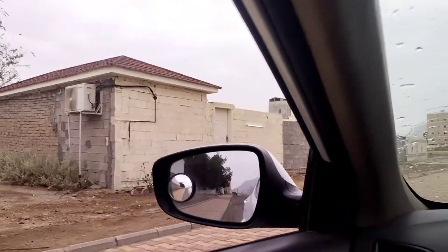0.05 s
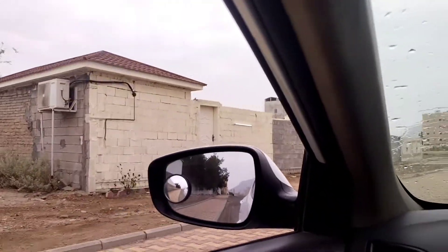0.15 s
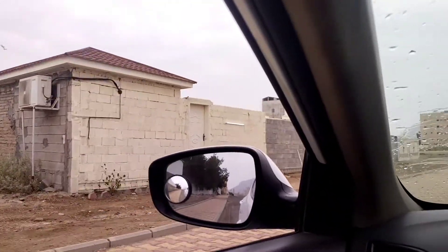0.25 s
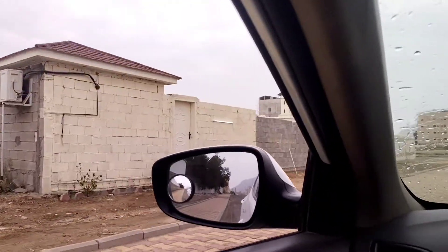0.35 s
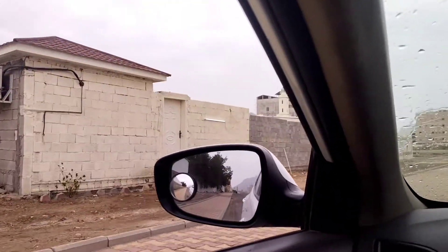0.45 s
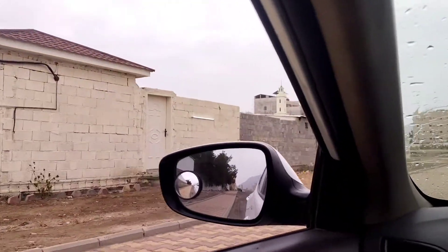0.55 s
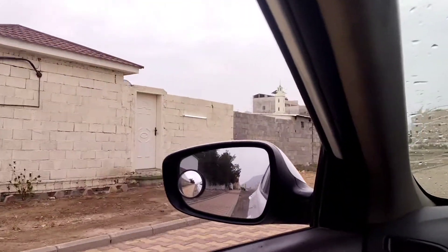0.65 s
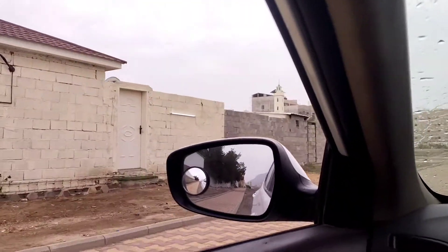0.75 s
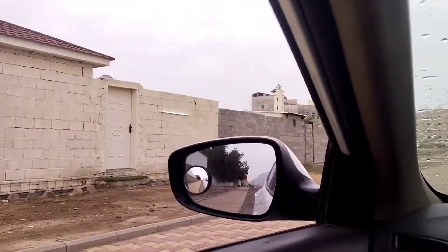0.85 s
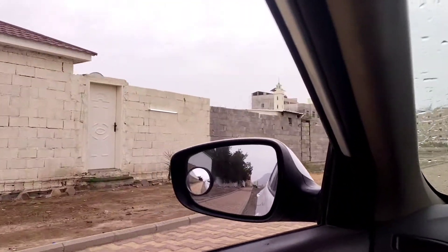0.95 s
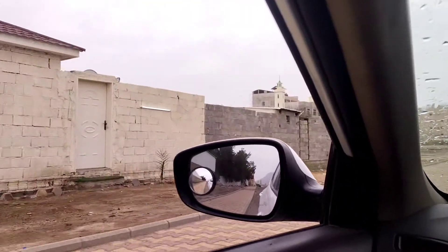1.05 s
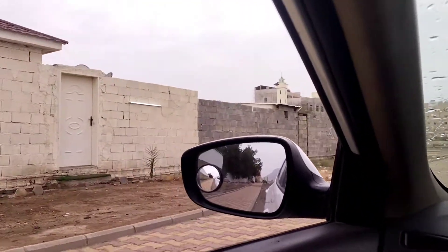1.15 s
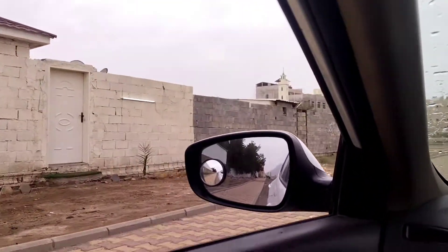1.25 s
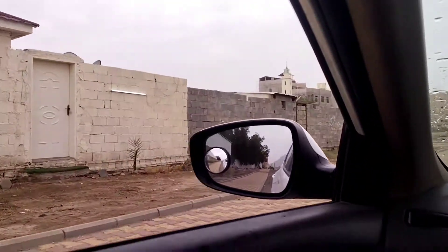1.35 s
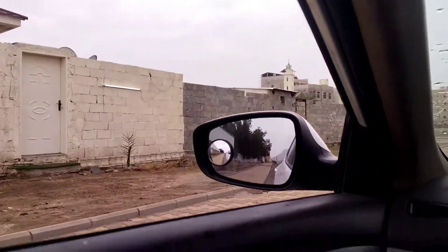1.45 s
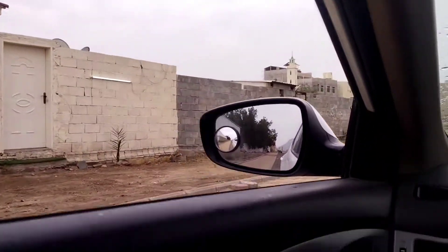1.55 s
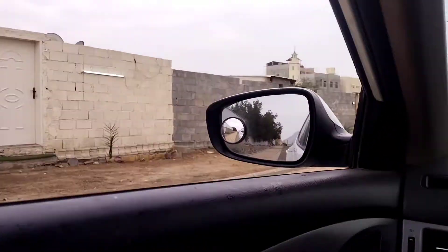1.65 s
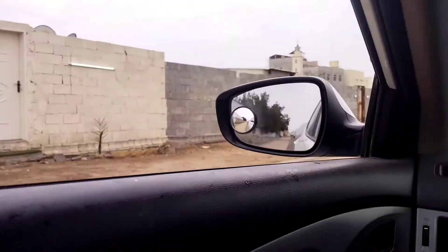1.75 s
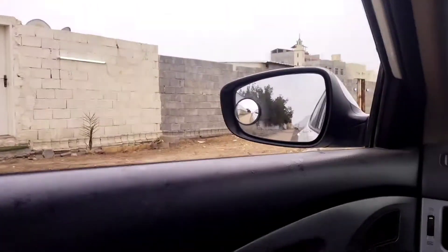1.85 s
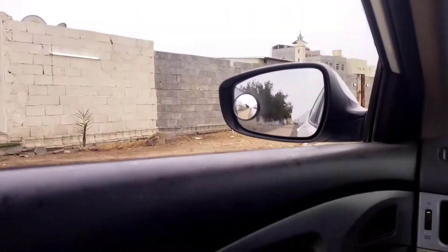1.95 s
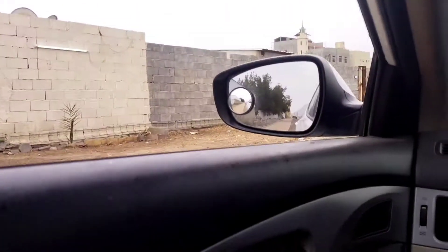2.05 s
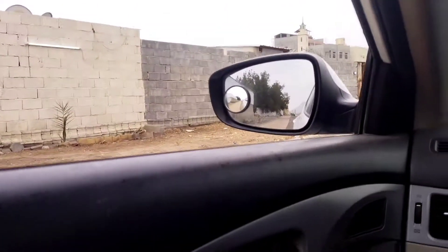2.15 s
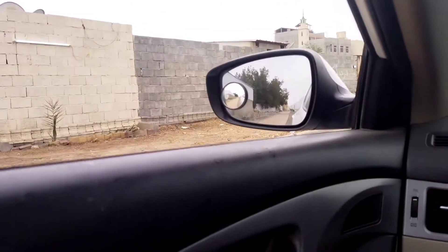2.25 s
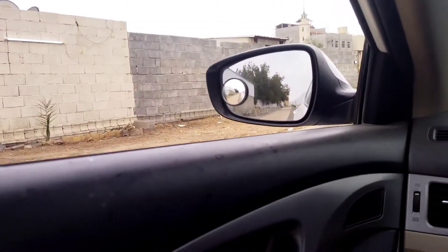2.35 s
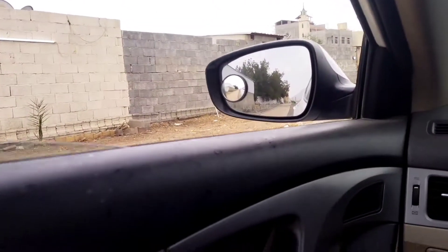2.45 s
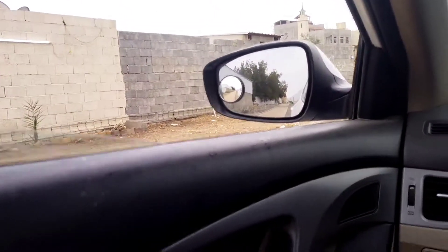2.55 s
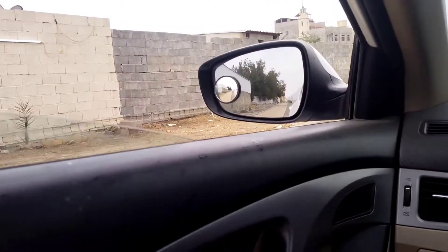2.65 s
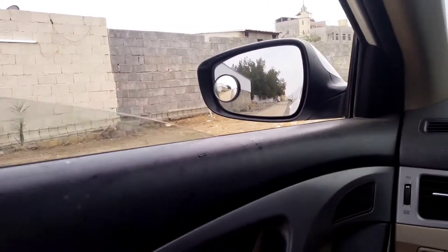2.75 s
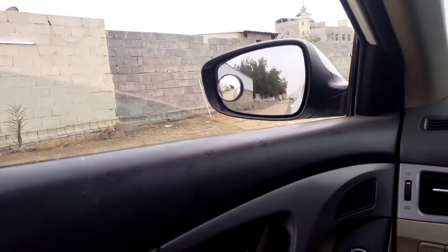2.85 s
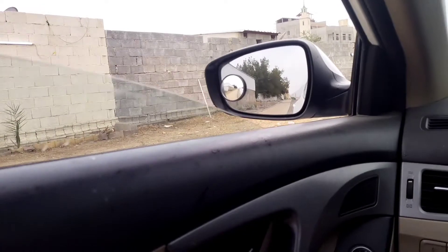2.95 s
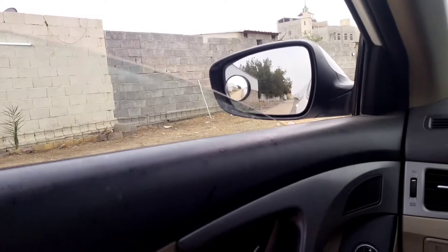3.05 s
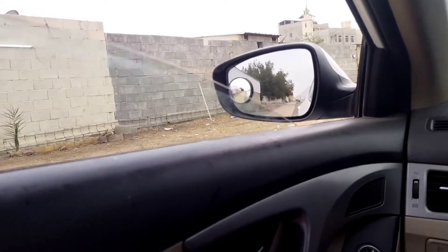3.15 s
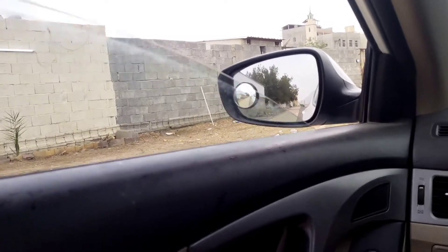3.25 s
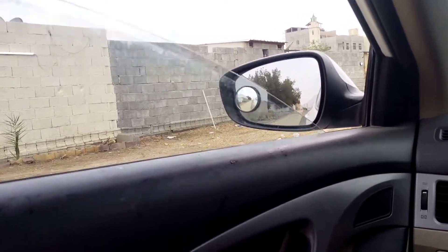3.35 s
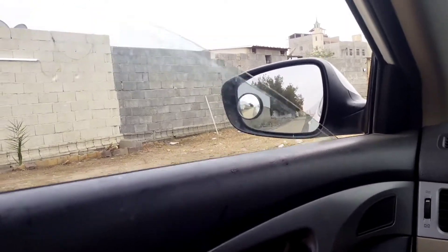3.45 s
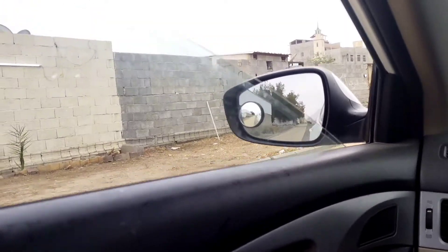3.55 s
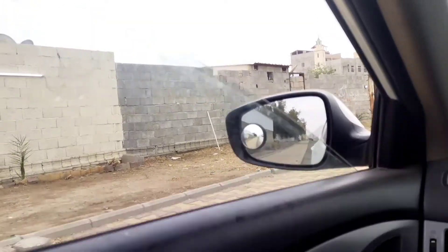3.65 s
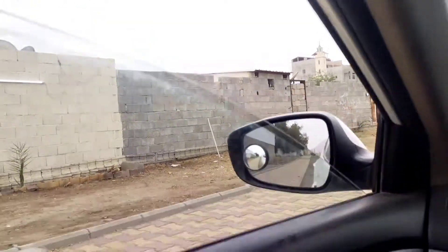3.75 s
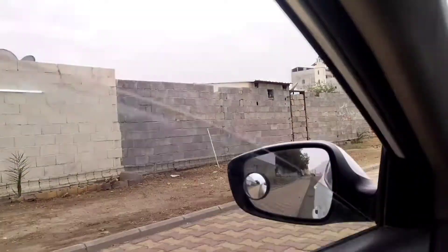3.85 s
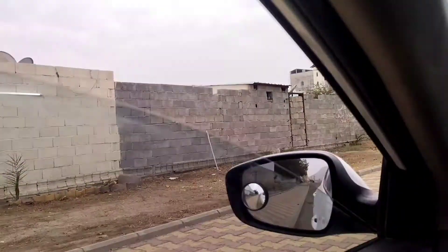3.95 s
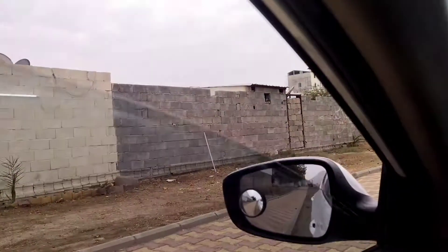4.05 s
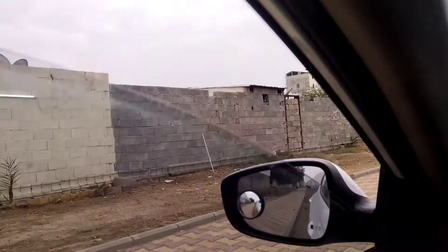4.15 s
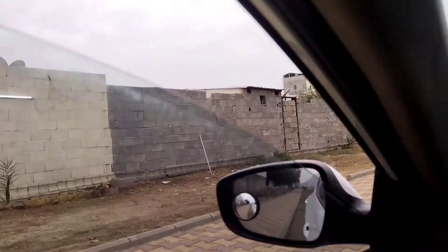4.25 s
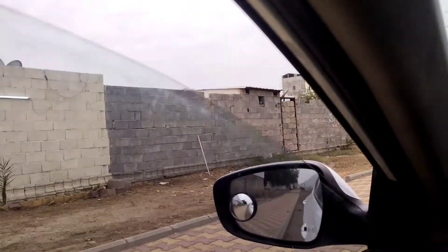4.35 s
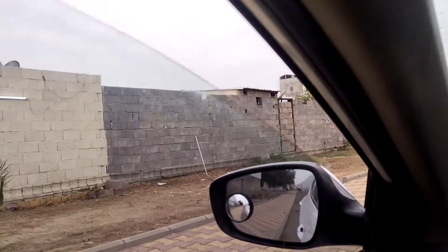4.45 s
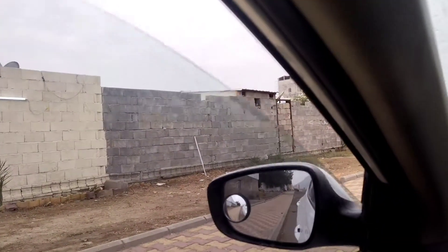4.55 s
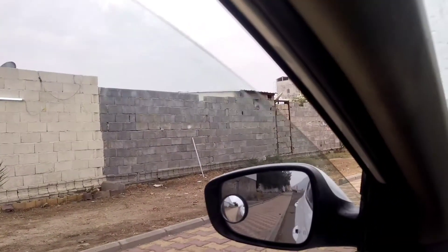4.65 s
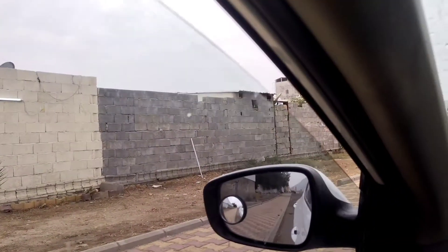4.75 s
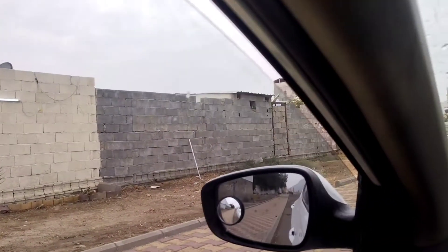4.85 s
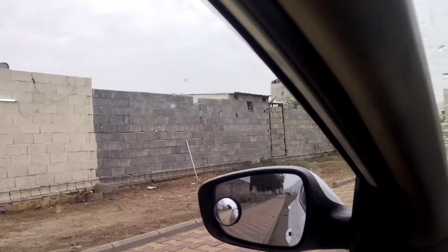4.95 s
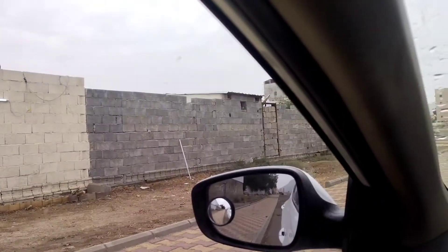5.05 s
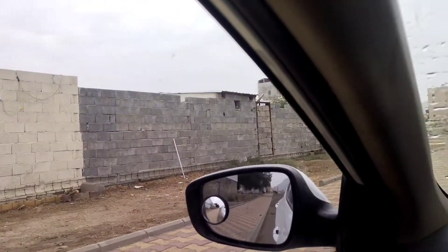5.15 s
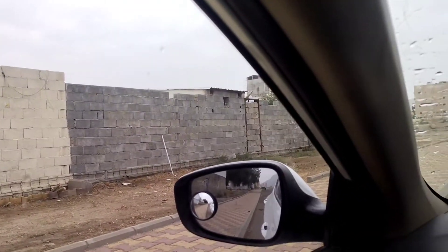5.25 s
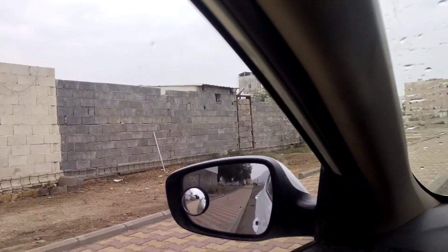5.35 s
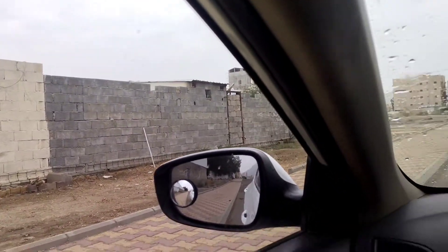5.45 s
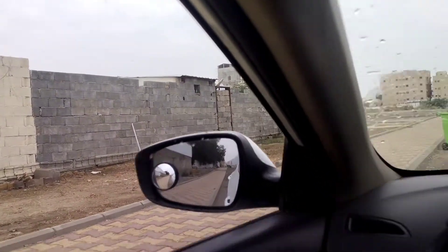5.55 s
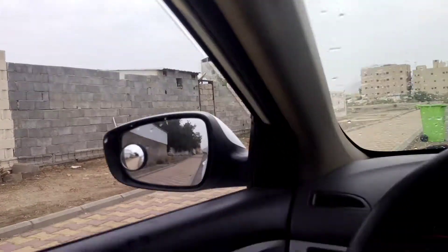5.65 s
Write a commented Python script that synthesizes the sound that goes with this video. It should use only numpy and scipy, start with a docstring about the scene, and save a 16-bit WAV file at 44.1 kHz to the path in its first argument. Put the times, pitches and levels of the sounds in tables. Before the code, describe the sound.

A car window motor whines and sags over low road rumble, glass hissing along its seals, then knocks shut before more clicks and a brief restart.

```python
"""From the seat beside an open window in a slowly rolling car: road rumble, engine hum and air, all noise and sines.
Blows ring the door's modes, a sleeve rubs and trim clicks; a switch snaps and an electric motor whines, sagging.
Gear noise rings its housing and the glass hisses along its seals, rasps into the top one and knocks into its frame.
The outside air drops away; the switch clicks again, the gear knocks and a rising whine tugs the pane from its seal."""
import sys
import numpy as np
from scipy import signal
from scipy.fft import rfft, irfft
from scipy.io import wavfile
from scipy.ndimage import uniform_filter1d

SR = 44100
rng = np.random.default_rng(int(sys.argv[2]) if len(sys.argv) > 2 else 0)


def store_pcm(level_fs):
    """Save levels as 16-bit WAV."""
    pcm = np.round(np.clip(level_fs, -1, 1) * 32767).astype(np.int16)
    wavfile.write(sys.argv[1], SR, np.atleast_2d(pcm).T)


N = 250750
TIME = np.arange(N) / SR
START_S, SHUT_S = 2.28, 5.135  # the motor is switched on, and the glass meets the frame
SPIN_UP_RISE_S = 0.018  # how quickly the whine comes in


def amp(db):
    """Decibels to gain."""
    return 10 ** (np.asarray(db) / 20)


def evened(x):
    """Scales to an rms of one."""
    return x / np.sqrt(np.mean(x ** 2) + 1e-20)


def read(points, hz):
    """Reads a table of values against frequency on a log-frequency axis."""
    f, value = np.transpose(points)
    return np.interp(np.log(hz + 1), np.log(f + 1), value)


def spectrum(points):
    """The dB spectrum drawn by a table of (Hz, dB) points."""
    return lambda hz: read(points, hz)


def resonances(modes):
    """The dB spectrum of a set of (Hz, width Hz, dB) resonances, their powers added."""
    def level_db(hz):
        power = sum(amp(db) ** 2 / (1 + ((hz - c) / w) ** 2) ** 2 for c, w, db in modes)
        return 10 * np.log10(power)
    return level_db


def curves(rows):
    """Each column of a time table, at every sample."""
    s, *columns = np.transpose(rows)
    return [np.interp(TIME, s, c) for c in columns]


def add(mix, s, sound):
    """Lays a sound into the mix at time s."""
    part = mix[:, max(round(s * SR), 0):][:, :sound.shape[-1]]
    part += sound[..., :part.shape[1]]


def panned(db):
    """Left and right gains for a level difference."""
    return amp(np.array([[db], [-db]]) / 2)


def swell(s, half):
    """A smooth rise and fall round time s."""
    fall = np.exp(-1.88 * abs(TIME - s) / half)
    return 2 * fall / (1 + fall ** 2)


def step(s, rise):
    """A smooth step from zero to one round time s."""
    return .5 + .5 * np.tanh((TIME - s) / rise)


def wander(rate_hz):
    """Slow chance of rms one, up to about the given rate."""
    coarse = TIME[::25]
    hz = np.fft.rfftfreq(len(coarse), coarse[1])
    drift = irfft(rfft(rng.standard_normal(len(coarse))) / (1 + (hz / rate_hz) ** 4), len(coarse))
    return np.interp(TIME, coarse, evened(drift))


def noise(colour, patchy_db=0, lean=1, size=N, comb_db=2.2):
    """Coloured noise with drifting patches at two microphone ports; the treble reaches the left one later."""
    # how alike the two ports hear a band: hz, likeness (0 to 1)
    port_likeness = [(60, 0.96), (200, 0.96), (400, 0.57), (700, 0.49), (1400, 0.095), (3000, 0.083),
                     (7000, 0.057), (15000, 0.081)]
    # left against right over the spectrum: hz, balance_db
    port_balance = [(60, 2), (200, -0.5), (700, -1), (1300, -0.5), (2400, 6), (4400, 6), (8000, 4),
                    (15000, -3.5)]
    port_lag_s = .0005
    hz = np.fft.rfftfreq(2048, 1 / SR)
    a, b, c, d, patches, ripple = rng.standard_normal((6, size // 512 + 5, len(hz)))
    patches = evened(uniform_filter1d(uniform_filter1d(patches, size=8, axis=0), size=16, axis=1))
    # reflections from glass and trim, as a slowly shifting chance ripple that is full above 1200 Hz
    ripple = evened(uniform_filter1d(uniform_filter1d(ripple, size=45, axis=0), size=6, axis=1))
    ripple_db = comb_db * np.minimum(hz / 1200, 1) * ripple
    same = np.clip(read(port_likeness, hz), -1, 1)
    left, own = a + 1j * b, c + 1j * d
    lead = np.exp(2j * np.pi * hz * port_lag_s * (hz > 1000))
    z = np.array([left, same * lead * left + np.sqrt(1 - same ** 2) * own])
    side_db = lean * read(port_balance, hz) / 2
    sides_db = np.array([side_db, -side_db])[:, None]
    z *= amp(colour(hz) + patchy_db * patches + ripple_db + sides_db)
    x = signal.istft(z.swapaxes(1, 2), nperseg=2048, noverlap=1536)[1][:, :size]
    return x / np.std(x.mean(0))


def cabin():
    """Road rumble and tyre hiss as coloured noise, engine as multiples of its firing rate; shutting dulls the air."""
    # road noise in the cabin, easing as the car rolls on: start_s, level_db
    road_level = [(0, -37), (.5, -44), (1.15, -44.5), (1.45, -47.5), (2.2, -47.5), (2.8, -52.5),
                  (4.2, -55.5), (5.69, -49)]
    # its spectrum: hz, relative level_db
    road_colour = [(20, -9), (45, -5), (70, -16), (95, 9.5), (125, 5), (190, 1.5), (260, -12.5), (400, -16),
                   (550, -22), (900, -35.5), (1100, -24.5), (1400, -36), (1800, -35.5), (2900, -37.5),
                   (5000, -48.5), (15000, -55)]
    # tyre hiss and outside air through the opening: start_s, level_db
    air_level = [(0, -71), (.58, -61.5), (.95, -62.5), (1.5, -60.5), (1.95, -61), (2.15, -55.5),
                 (2.55, -60.5), (3.75, -58), (4.15, -63.5), (4.8, -61.5), (5.1, -62.5)]
    # its spectrum: hz, relative level_db
    air_colour = [(300, 2), (750, 9), (930, 2), (1100, 1), (1350, 4), (1540, -1), (1780, 4.5), (2250, -4),
                  (2650, 0.5), (2950, -2.5), (3350, 1), (3900, -3.5), (5000, -4.5), (6300, -5),
                  (8000, -6.5), (11000, -15), (15000, -22)]
    # engine: start_s, firing_hz, level_db
    engine = [(0, 31.01, -54), (2.9, 32.49, -53.5), (3.75, 34.38, -42.5), (4.4, 34.66, -46.5),
              (5.69, 34.25, -38.5)]
    # engine orders: multiple of the firing rate, relative level_db
    orders = [(2, -26.5), (3, -13), (4, -8), (5, -6.5), (8, -13), (9, -10), (10, -12), (12, -16.5)]
    gust_db, gust_hz = 1.16, 27  # the outside air flutters
    sealed_db, sealing_s = -23, 0.061  # the shut window takes this much off it, within this time

    road = amp(curves(road_level)[0]) * noise(spectrum(road_colour), patchy_db=1.7)
    sealing = np.clip((TIME - SHUT_S) / sealing_s, 0, 1)
    air_db = curves(air_level)[0] + gust_db * wander(gust_hz) + sealed_db * sealing
    air = amp(air_db + .7 * wander(120)) * noise(spectrum(air_colour), patchy_db=2.1, comb_db=3)
    firing_hz, hum_db = curves(engine)
    turns = np.cumsum(firing_hz * (1 + 0.0025 * wander(2.13))) / SR
    hum = np.zeros(N)
    for k, db in orders:
        hum += amp(db + 2.5 * wander(5.7)) * np.sin(2 * np.pi * (k * turns + rng.random()))
    return road + air + amp(hum_db) * hum


def blows(count=3, detune=0.032, attack_s=0.0036, thud_db=-14, thud_t60=.11):
    """Each push rings the door's modes near its centre over a dull trim thud, then rebounds after ever shorter waits."""
    # blows on the door, from road bumps, gear, glass and hand:
    # start_s, ring peak level_db, push centre_hz, narrowness, each rebound against the last (dB)
    pushes = [(0.037, -23, 132, 4, -8), (0.246, -34.5, 126, 6.8, -27), (0.71, -48.5, 290, 1.8, 1.5),
              (1.04, -40, 274, 2.4, -4.5), (2.017, -29, 730, 1.75, -8.5), (2.179, -42, 766, 7.6, -15),
              (2.285, -29.5, 457, 1.1, -7), (2.308, -28, 500, 1.7, -11), (2.316, -31, 228, 1.9, -23),
              (2.324, -32.5, 790, 7.7, -9.5), (2.346, -28, 198, 1.8, -20), (2.36, -35, 170, 1, -15),
              (2.371, -34, 180, 1.1, -7), (3.922, -26.5, 171, 2.3, -1), (4.073, -29, 267, 1.6, -26),
              (5.022, -27.5, 138.4, 2.6, -9), (5.084, -30.5, 116, 2.47, -25), (5.131, -18, 112, 1.66, -9.5),
              (5.135, -26.5, 566, 4.2, -20), (5.162, -25, 139, 1.2, -24), (5.184, -21, 122, 2.2, -8),
              (5.467, -30.5, 402, 0.73, -15), (5.506, -27.5, 290, 1.3, -11), (5.552, -20, 750, 0.7, -29),
              (5.555, -22, 305, 2.7, -26), (5.587, -26.5, 280, 0.75, -12)]
    # door modes: hz, level_db, t60_s
    door_modes = [(92.3, -1.5, 0.12), (120.2, 1, 0.14), (167.2, 2.5, 0.15), (205, 11, 0.039),
                  (275, 5.5, 0.16), (337.8, 1, 0.16), (438, 7.5, 0.069), (569, 7.5, 0.036), (726, -2, 0.1),
                  (805, -7.5, 0.13), (990, 9.5, 0.013), (1198, 13, 0.025), (1340, -9, 0.017)]
    rebound_s, rebound_shrink = .032, .76  # first wait; each later wait is this share of the last

    out, t = np.zeros((2, N)), TIME[:SR // 4]
    hz, mode_db, t60 = np.transpose(door_modes)[:, :, None]
    sign = (-1) ** np.arange(len(door_modes))[:, None]  # neighbouring modes swing in opposite senses
    decays = sign * amp(mode_db - 60 * t / t60)
    bins = np.fft.rfftfreq(len(t), 1 / SR) + 1
    attack = 1 - np.exp(-t / attack_s)
    for s, db, centre_hz, narrow, rebound_db in pushes:
        push = lambda f: 1 / (1 + (narrow * np.log(f / centre_hz)) ** 2) ** 2
        struck_hz = hz * (1 + detune * rng.standard_normal(hz.shape))  # each blow rings a little differently
        ring = (decays * push(hz) * np.sin(2 * np.pi * struck_hz * t)).sum(0) * attack
        dulling = 1 + (bins / hz.max()) ** 4
        trim = evened(irfft(rfft(rng.standard_normal(len(t))) * push(bins) / dulling, len(t)))
        thud = trim * amp(thud_db - 60 * t / thud_t60) * attack
        for k in range(count):
            add(out, s, amp(db + k * rebound_db) * (ring / abs(ring).max() + thud))
            s = s + rebound_s * rebound_shrink ** k
    return out


def rubs(stutter_db=2, stutter_hz=70):
    """A sleeve on the trim, or the pane leaving its seal, drags unevenly; each stroke swells and fades."""
    # brief strokes: height_s, half_length_s, swish level_db, low rub level_db
    strokes = [(0.238, 0.014, -84, -54.5), (0.528, 0.012, -60, -60), (.58, 0.029, -64, -68),
               (0.909, 0.017, -63, -65), (1.112, 0.031, -56, -74), (1.365, 0.013, -62, -66),
               (1.19, 0.025, -65, -55), (1.516, 0.029, -61, -58), (1.604, 0.029, -62.5, -70),
               (1.736, 0.046, -63, -57.5), (2.054, 0.074, -53, -51), (2.255, 0.047, -57.5, -66),
               (5.382, 0.026, -60.5, -54), (5.459, 0.019, -59, -41), (5.529, 0.049, -59, -39.5),
               (5.596, .012, -50, -36), (5.616, 0.014, -39.5, -31), (5.663, 0.035, -43, -41)]
    # spectrum of the swish: hz, relative level_db
    swish_colour = [(400, -31), (900, -11), (1300, 0.5), (2000, -3), (2600, 3.5), (3400, 0.5), (4600, -5.5),
                    (6200, -3.5), (8000, -14), (9000, -13), (11500, -27), (15400, -36.5)]
    # spectrum of the low rub: hz, relative level_db
    rub_colour = [(60, -28), (130, -12), (220, 0.5), (330, -3.5), (440, -2.5), (600, -9.5), (850, -15),
                  (1300, -19), (2000, -23), (5000, -53)]
    swish = amp(1.94 * wander(200)) * noise(spectrum(swish_colour), patchy_db=2, lean=.4)
    rub = noise(spectrum(rub_colour), patchy_db=1) * amp(stutter_db * wander(stutter_hz))
    swish_gain, rub_gain = sum(amp([[swish_db], [rub_db]]) * swell(s, half)
                               for s, half, swish_db, rub_db in strokes)
    return swish_gain * swish + rub_gain * rub


def squeaks(waver=.002):
    """Brief stick-slip whistles that swell, waver in pitch and fade."""
    # squeaks of trim, and of glass on rubber: height_s, level_db, pitch_hz, half_length_s, left-right balance_db
    whistles = [(0.338, -63, 1430, 0.022, 3), (3.528, -32.5, 8915, .014, -7.5),
                (5.634, -42, 10390, 0.0072, -17)]
    out = np.zeros((2, N))
    for s, db, hz, half, side_db in whistles:
        pitch = hz * (1 + waver * wander(95))
        tone = np.sqrt(2) * np.sin(2 * np.pi * np.cumsum(pitch) / SR)
        out += amp(db) * panned(side_db) * tone * swell(s, half)
    return out


def clicks(tail_db=-21, tail_t60=0.29):
    """Hard plastic contacts: a dense, quickly dying ring round one main resonance, and the cabin's short tail."""
    # clicks of switch, latch and trim: start_s, level_db, tilt (dB per octave),
    # main resonance_hz, its height_db, ring t60_s, left-right balance_db
    contacts = [(0.528, -54, -1, 1400, 8, 0.093, 11), (0.5339, -47, 1, 3430, 11, 0.033, 15),
                (2.008, -49, -0.5, 1200, 1, 0.15, 14), (2.016, -31, 1, 1240, 2, 0.06, 6.5),
                (2.178, -45, 0.5, 1330, 0, 0.087, 4.5), (2.2845, -39, 1, 1720, 9, 0.06, 0),
                (2.291, -37, -5, 2400, 7, 0.072, -2), (2.2977, -43, -1.5, 3200, 5, 0.05, 0),
                (2.31, -38.5, -6.5, 1500, 2, 0.082, 1), (2.320, -42, -9, 1750, 10, 0.24, -2),
                (5.1027, -29, -1, 2600, 6, 0.03, 2), (5.1175, -33.5, 0, 2350, 16, 0.03, 2),
                (5.135, -28, 0.5, 3540, 10, 0.03, 3), (5.1371, -28, -1, 3530, 11, 0.022, 2),
                (5.143, -37, -8.5, 1380, -7, 0.15, -2), (5.39, -35, -0.5, 1360, 13, 0.088, 0),
                (5.3959, -30, 1, 2670, 11.5, 0.033, 3.5), (5.453, -41.5, 0, 1340, 13, 0.06, 9.5),
                (5.468, -42.5, -4.5, 1300, 11, 0.076, 6), (5.475, -43, -7, 1200, 10, 0.051, 6),
                (5.512, -45, -1, 1300, 6, 0.062, 4), (5.4998, -35.5, 3.5, 5030, 3, 0.034, 8),
                (5.548, -33.5, -7, 1170, 6, 0.094, 12), (5.5525, -23, -9, 1100, 12, 0.034, 7.5)]
    # spectrum common to all of them: hz, relative level_db
    click_colour = [(30, -70), (200, -16), (500, 4.5), (750, 5.5), (1000, 0), (1400, 2.5), (1750, -3.5),
                    (2800, 1), (3500, -1), (4300, -7), (6000, -4), (7500, -16.5), (10000, -21),
                    (15000, -33)]
    # the cabin's short echo of every click: hz, relative level_db
    echo_colour = [(100, -25), (500, 11.5), (1400, -0.5), (3200, -6.5), (6200, -15), (15000, -32)]
    out, t = np.zeros((2, N)), TIME[:SR // 4]
    for s, db, tilt_db, main_hz, peak_db, t60, side_db in contacts:
        tilt = lambda hz: tilt_db * np.log2(hz + 1)
        peak = lambda hz: peak_db / (1 + ((hz / main_hz - 1) / 0.11) ** 2)
        ring_colour = lambda hz: read(click_colour, hz) + tilt(hz) + peak(hz)
        tail_colour = lambda hz: read(echo_colour, hz) + tilt(hz) / 2
        ring = noise(ring_colour, patchy_db=1, lean=0, size=len(t), comb_db=1)
        echo = noise(tail_colour, lean=0, size=len(t), comb_db=0)
        sound = ring * amp(-60 * t / t60) + echo * amp(tail_db - 60 * t / tail_t60)
        add(out, s, amp(db) * panned(side_db) * sound * (1 - np.exp(-t / 0.00031)))
    return out


def snap():
    """The contact closes on the motor: a hard, bright, brief ring."""
    # resonances of the contact: hz, width_hz, level_db
    contact_modes = [(2580, 200, -12), (3310, 230, 2), (5860, 620, -5), (8900, 2200, -22.5)]
    level_db, t60_s = -24.5, .018
    t = np.maximum(TIME - START_S, 0)
    ring = noise(resonances(contact_modes), comb_db=0)
    return amp(level_db - 60 * t / t60_s) * (1 - np.exp(-t / 0.00015)) * ring


def travel():
    """How far the glass has risen: minus a half at the bottom, plus a half at the top."""
    return np.clip((TIME - START_S) / (SHUT_S - START_S), 0, 1) - .5


def running():
    """One while the motor has current, dying quickly once the glass is home."""
    stop_db_per_s = 1100
    return (TIME >= START_S) * amp(-stop_db_per_s * np.maximum(TIME - SHUT_S, 0))


def effort(levels, jolt_s):
    """Gain of a driven part: a jolt at the start, a steady run, and rising strain as the pane meets the top seal."""
    pinch_s = 0.099  # the pane squeezes into the top seal over about this time
    run_db, travel_db, jolt_db, strain_db = levels
    run = amp(run_db + travel_db * travel())
    jolt = amp(jolt_db) * np.exp(-np.maximum(TIME - START_S, 0) / jolt_s)
    strain = amp(strain_db) * np.exp(np.minimum(TIME - SHUT_S, 0) / pinch_s)
    return running() * np.sqrt(run ** 2 + jolt ** 2 + strain ** 2)


def gear(hz, phase, overtones_db=-3):
    """Worm gear and cable drum: rumble ringing the door, a grind, and tooth chatter that pulses with the whine."""
    # rumble: running level_db, change over the travel (dB), starting jolt level_db, strain at the top level_db
    rumble_levels = (-53, 9, -36, -48)
    # tooth chatter: the same columns
    chatter_levels = (-61.5, -4.5, -50, -48)
    # resonances of the rumble: hz, width_hz, level_db
    body_modes = [(334.8, 111, 1.5), (420, 94, 11), (547, 39, 2), (781, 39, 3.5), (995, 93, 1.5)]
    # resonances of the gear housing, rung by the teeth: hz, width_hz, level_db
    teeth_modes = [(1273, 36, -7), (1703, 60, 4), (2510, 110, -10), (2740, 33, -3.5), (2857, 31, 1.5),
                   (3250, 60, -2.5), (3630, 113, 1.5), (4520, 360, -8.5), (6450, 220, -9)]
    # resonances of the grinding drum: hz, width_hz, level_db
    grind_modes = [(420, 110, -5), (634, 150, 4.5), (1350, 70, -4.5)]
    rumble_jolt_s, chatter_jolt_s = 0.052, 0.024  # time in which the starting jolt settles
    # a stiff spot partway up, where the drum grinds and the teeth chatter louder
    stiff_s, stiff_half_s, stiff_chatter_db, grind_db = 3.53, 0.33, 3, -49.5
    # the frame steadies the pane and calms the chatter: when, how quickly, how much
    steady_s, steady_rise_s, steady_db = 3.71, 0.045, -4.5

    stiff = swell(stiff_s, stiff_half_s) * running()
    rumble = effort(rumble_levels, rumble_jolt_s) * noise(resonances(body_modes), patchy_db=1.5)
    grind = amp(grind_db) * stiff * noise(resonances(grind_modes), patchy_db=1.5)
    teeth = resonances(teeth_modes)
    rattle = noise(teeth, patchy_db=3.4) * (1 + .3 * np.cos(phase))
    # high overtones sing out as they sweep through the housing's resonances
    overtones = np.zeros((2, N))
    for k in range(3, 8):
        overtones += amp(teeth(k * hz) + 3.5 * wander(14)) * np.sin(k * phase + np.array([[0], [k]]))
    chatter = effort(chatter_levels, chatter_jolt_s) * (rattle + amp(overtones_db) * panned(3.1) * overtones)
    chatter_db = stiff_chatter_db * stiff + steady_db * step(steady_s, steady_rise_s)
    return rumble + grind + amp(chatter_db) * chatter


def wavers():
    """The brief dips and swells of the whine and of its octave, in dB."""
    # height_s, half_length_s, whine change (dB), octave change (dB)
    changes = [(2.407, 0.018, 1.5, -7), (2.548, 0.046, -10, 1), (2.635, 0.027, -1.5, -9),
               (3.084, 0.025, 1, -4), (3.17, 0.017, -4.5, 3), (3.764, 0.024, -0.5, -5),
               (3.89, .04, 0.5, 5.5), (4.401, .035, 2, 6.5), (4.534, 0.015, 1, -10), (4.93, .03, -3.5, 2.5),
               (5.06, .018, -9, -3)]
    return sum(np.array([[whine_db], [octave_db]]) * swell(s, half) for s, half, whine_db, octave_db in changes)


def motor():
    """The commutator's whine, its octave and a half-speed drone, all following the speed; it drives the gear."""
    # motor speed, sagging wherever the glass drags: start_s, pitch_hz
    speed = [(2.39, 583), (2.46, 550.4), (2.55, 551.7), (2.65, 523), (2.78, 504), (2.87, 528.3),
             (2.94, 507.7), (3.09, 507.2), (3.3, 531.5), (3.66, 540), (3.77, 520), (3.99, 509.4),
             (4.04, 466), (4.09, 472.6), (4.15, 451), (4.26, 453), (4.52, 491.4), (4.67, 533), (4.98, 519),
             (5.09, 553), (5.15, 530)]
    # the whine grows with load, and each pitch sets up its own standing wave in the cabin:
    # pitch_hz, level_db, left-right balance_db
    whine_levels = [(450, -33, -2), (485.4, -36.5, -3), (490, -40.5, -8), (505, -36.5, 2),
                    (510.3, -40.5, 3), (537, -41, -3), (540, -46, -4.5), (575, -42, 2.5)]
    # the whine's octave: start_s, level_db
    octave_level = [(2.38, -60.5), (2.55, -50.5), (2.66, -55), (3.1, -59), (3.2, -48), (3.66, -46.5),
                    (3.78, -54), (4.62, -51), (5.1, -47.5)]
    # a door panel growls along with the drone: hz, width_hz, level_db
    panel_modes = [(260.5, 5.2, 0)]
    panel_db = -4  # against the drone
    whine_travel_db = -5  # change from the bottom of the travel to the top
    spin_up_s = 0.093  # the whine comes in this long after the start
    # the drone holds while the gear takes up the glass, then falls to its rest
    drone_start_db, drone_hold_s, drone_fall_db_per_s, drone_rest_db = -46.5, 0.365, 222, -67

    hz = curves(speed)[0]
    phase = 2 * np.pi * np.cumsum(hz * (1 + 0.00333 * wander(33))) / SR
    # ten segments pass per turn of a slightly uneven shaft
    shaft = np.sqrt(2) * (1 + 0.15 * np.sin(phase / 10))
    pitch, level, lean = np.transpose(whine_levels)
    whine_waver_db, octave_waver_db = wavers()

    whine_db = np.interp(hz, pitch, level) + whine_travel_db * travel() + whine_waver_db
    side = amp(np.interp(hz, pitch, lean) * np.array([[1], [-1]]) / 2)
    whine = amp(whine_db + 1.0 * wander(36)) * shaft * np.sin(phase + np.array([[0], [.35]])) * side

    octave_db = curves(octave_level)[0] + octave_waver_db + 1.4 * wander(26.0)
    octave = amp(octave_db) * shaft * np.sin(2 * phase + np.array([[0], [1.5]])) * panned(3.8)

    falling_s = np.maximum(TIME - START_S - drone_hold_s, 0)
    drone_db = np.maximum(drone_start_db - drone_fall_db_per_s * falling_s, drone_rest_db)
    growl = amp(panel_db) * noise(resonances(panel_modes))
    drone = amp(drone_db + 1.0 * wander(25)) * (np.sin(phase / 2) + growl)

    spun_up = step(START_S + spin_up_s, SPIN_UP_RISE_S)
    return (whine + octave + drone) * spun_up * running() + gear(hz, phase)


def seals():
    """Glass on felt and rubber: a grainy hiss; entering the channel, it steps up and the pane's edge sings a while."""
    # hiss: running level_db, change over the travel (dB), starting jolt level_db, strain at the top level_db
    slide_levels = (-55, 3.5, -75, -49)
    # its spectrum: hz, relative level_db
    slide_colour = [(700, -25.5), (1250, -23), (1500, -38), (1950, -23.5), (2200, -5), (2600, 0),
                    (3200, -1.5), (3900, -5), (4800, -4.5), (6100, -3), (7000, -6.5), (8300, -13.5),
                    (9500, -12.5), (11000, -21), (15400, -28.5)]
    # resonances of the pane's edge as it rubs in the channel: hz, width_hz, level_db
    edge_modes = [(2163, 90, -4), (2280, 150, -1), (2610, 71, 0), (3220, 47, -1.5)]
    jolt_s = 0.36  # time in which the pane comes unstuck
    # the pane's upper edge enters the side channel: when, how quickly, and the step in hiss
    channel_s, entry_s, channel_db = 4.14, 0.068, 3.5
    edge_db, edge_fall_db_per_s = -54.5, 7.5

    hiss = noise(spectrum(slide_colour), patchy_db=1.6, comb_db=2.6)
    edge = noise(resonances(edge_modes), patchy_db=2)
    entered = step(channel_s, entry_s)
    fading = amp(edge_db - edge_fall_db_per_s * np.maximum(TIME - channel_s, 0))
    sliding = effort(slide_levels, jolt_s) * amp(channel_db * (entered - .5)) * hiss
    singing = entered * running() * fading * edge
    return (sliding + singing) * amp(0.33 * wander(250))  # fine grain


def rasp(side_db=6, slip_t60=.006, stutter_db=2, stutter_hz=130):
    """Rubber catches and lets go of the pane many times over; each slip cracks, and rings the tightening seal."""
    # spectrum of one crack: hz, relative level_db
    crack_colour = [(500, -25), (1600, -16), (2150, 5), (3000, 2), (4400, -4), (5200, -6), (6500, 2),
                    (8000, -23), (15000, -33)]
    start_s, rise_s, slips_per_s, spread_db = 5.05, 0.013, 7000, 3.5
    ring_hz, fall_hz_per_s, width_hz = 3850, 19500, 600  # the ring's resonance falls until the window is shut
    ring_db, crackle_db = -45.5, -45

    chance, size, sign = rng.random(N), rng.exponential(1, N), rng.choice([-1, 1], N)
    slips = (chance < slips_per_s / SR) * sign * amp(spread_db * np.minimum(size, 3))
    t = TIME[:SR // 10]
    crack = noise(spectrum(crack_colour), size=len(t), lean=0, comb_db=0) * amp(-60 * t / slip_t60)
    crackle = evened(signal.oaconvolve(slips[None], crack, axes=1)[:, :N])
    # shifting the slips down to zero pitch and back lets a fixed filter follow the falling resonance
    hz = ring_hz - fall_hz_per_s * np.clip(TIME - start_s, 0, SHUT_S - start_s)
    turn = np.exp(2j * np.pi * np.cumsum(hz) / SR)
    r = np.exp(-np.pi * width_hz / SR)
    ring = evened((turn * signal.lfilter([1], np.poly([r, r]), slips / turn + 1e-18)).real)
    grip = step(start_s, rise_s) * running() * amp(stutter_db * wander(stutter_hz))
    return grip * panned(side_db) * (amp(crackle_db) * crackle + amp(ring_db) * ring)


def restart():
    """The motor runs up again, its whine rising steadily as the pane comes free."""
    start_s, start_hz, rise_hz_per_s, level_db = 5.632, 538, 880, -40.5
    hz = start_hz + rise_hz_per_s * np.maximum(TIME - start_s, 0)
    return amp(level_db) * step(start_s, SPIN_UP_RISE_S) * np.sin(2 * np.pi * np.cumsum(hz) / SR)


def scene():
    """Everything heard from the seat beside the window."""
    before = cabin() + blows() + rubs() + squeaks() + clicks()
    return before + snap() + motor() + seals() + rasp() + restart()


def record(dry):
    """The microphones lose the deepest bass, and the recorder limits the band at the top."""
    low_cut_hz, edge_hz = 38, 15450
    low_cut = signal.butter(N=2, Wn=low_cut_hz, btype="high", fs=SR, output="sos")
    thinned = signal.sosfilt(low_cut, dry)
    band_limit = signal.firwin(511, edge_hz, window=("kaiser", 9), fs=SR)
    return signal.oaconvolve(thinned, band_limit[None], "same", axes=1)


dry = scene()
out = record(dry)
store_pcm(out)
```